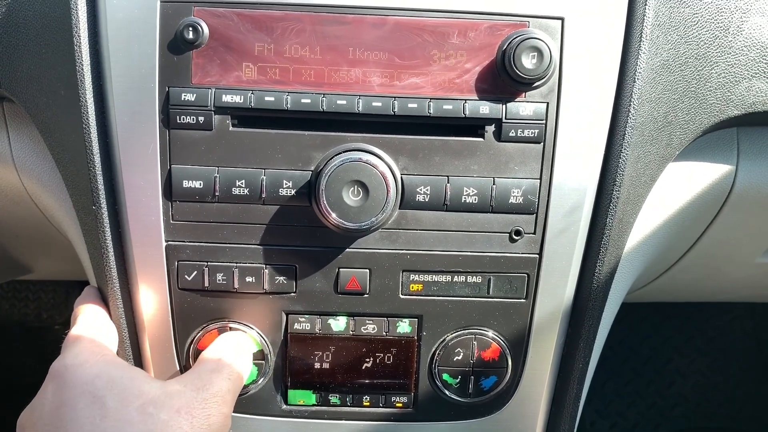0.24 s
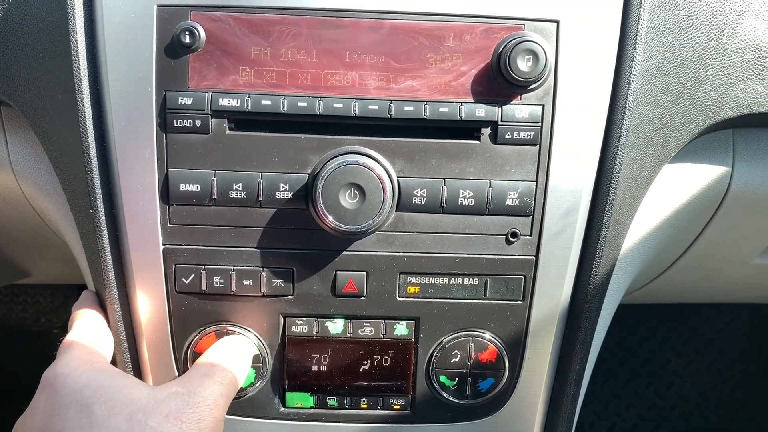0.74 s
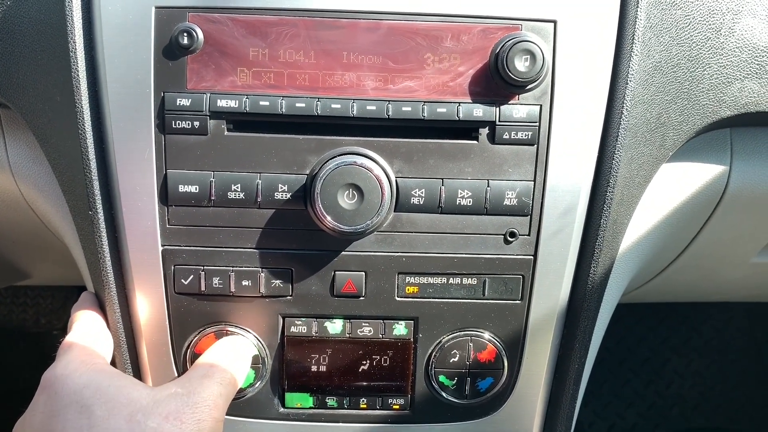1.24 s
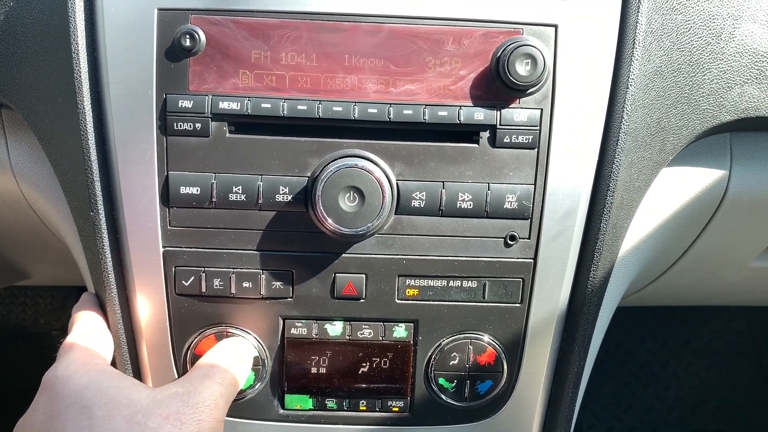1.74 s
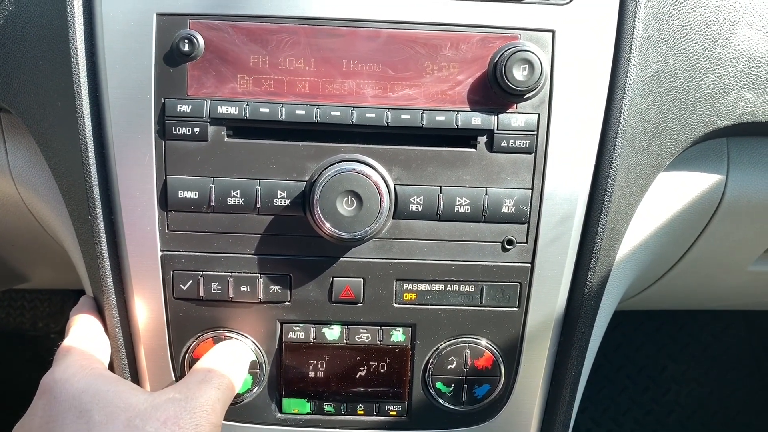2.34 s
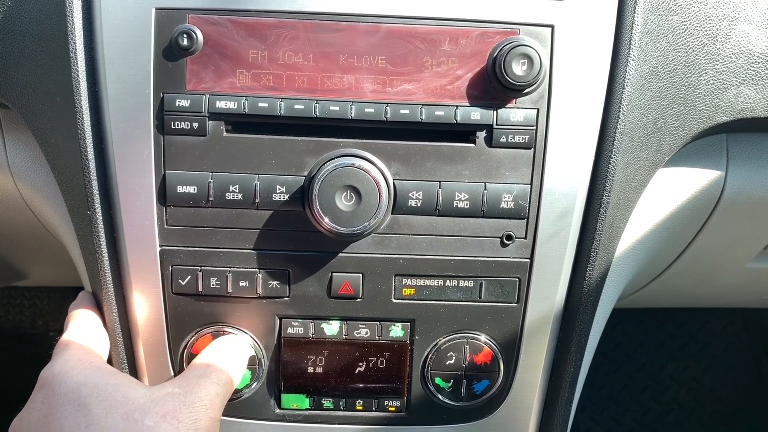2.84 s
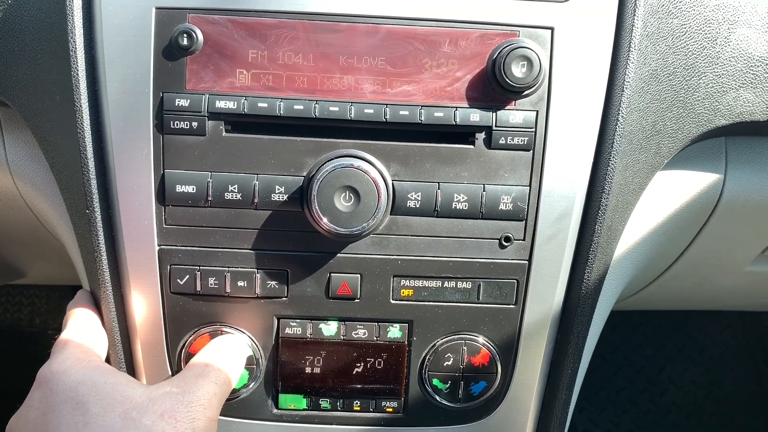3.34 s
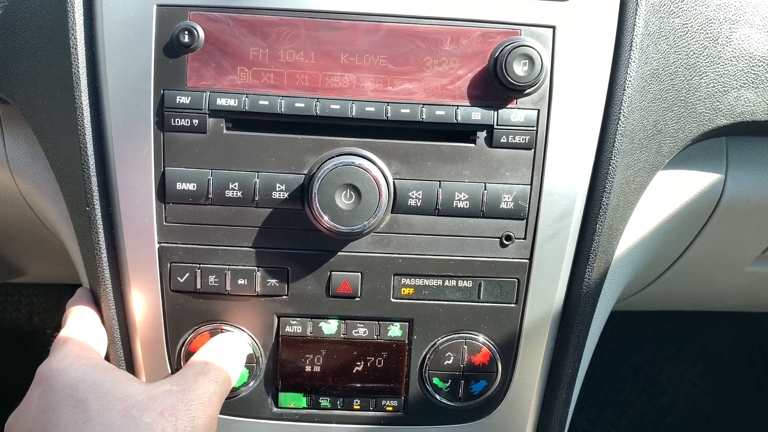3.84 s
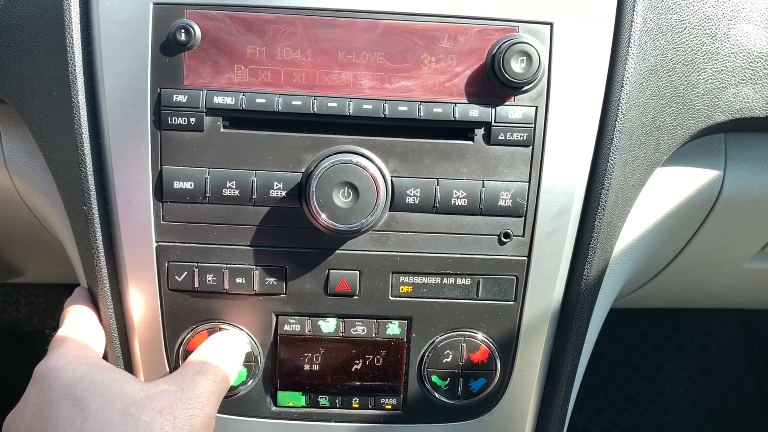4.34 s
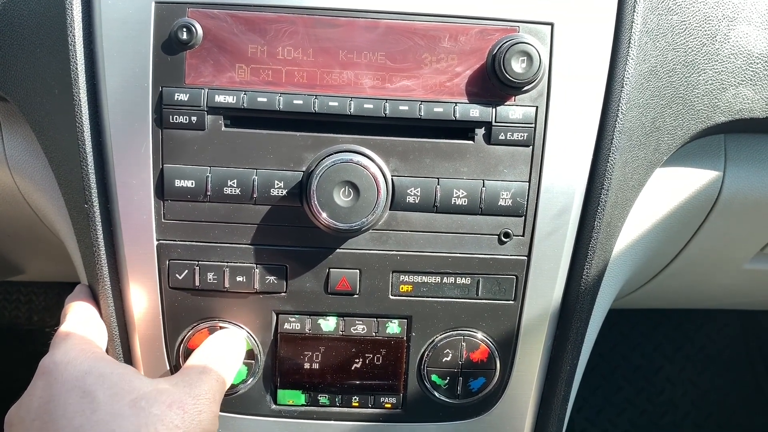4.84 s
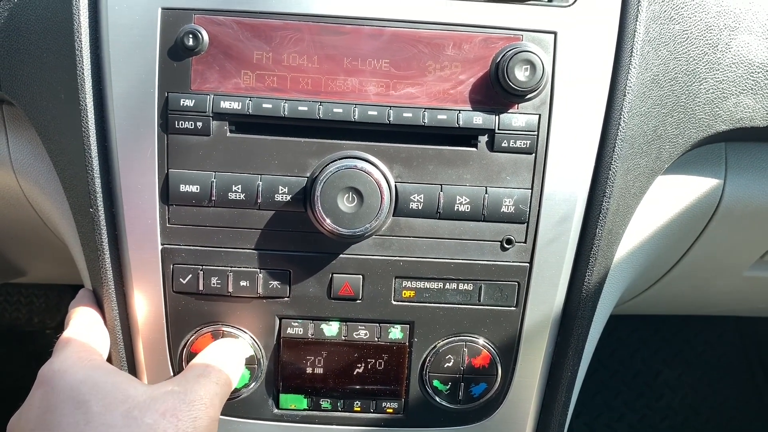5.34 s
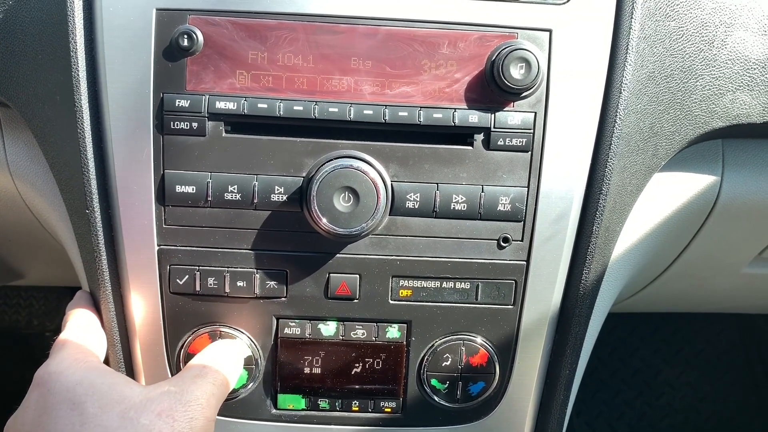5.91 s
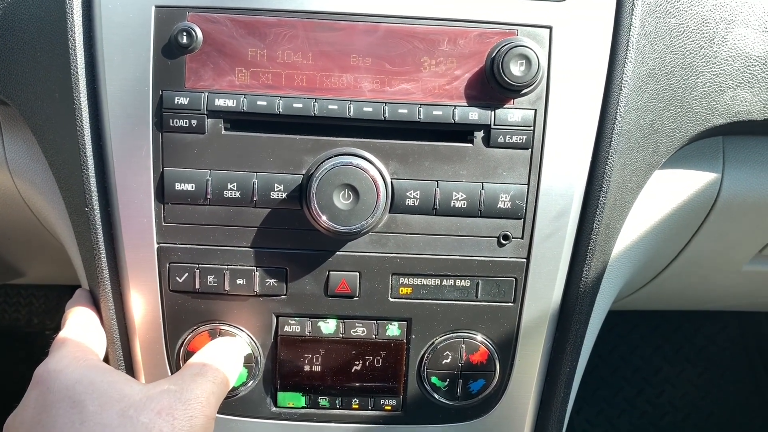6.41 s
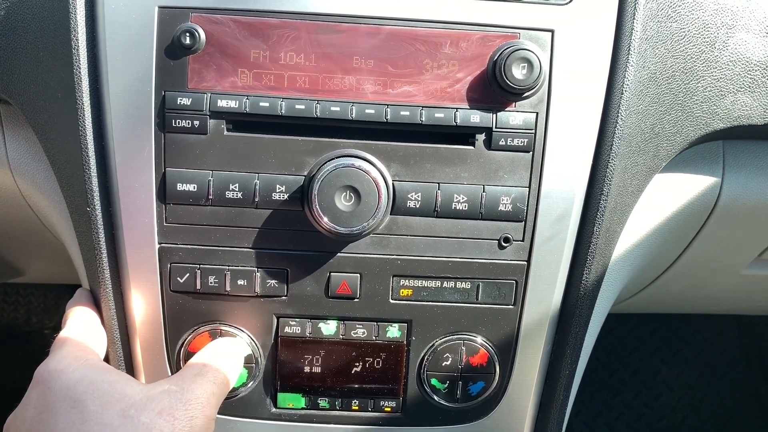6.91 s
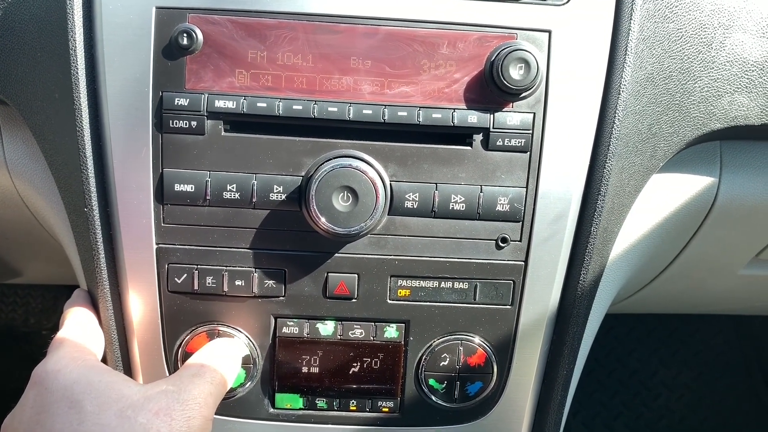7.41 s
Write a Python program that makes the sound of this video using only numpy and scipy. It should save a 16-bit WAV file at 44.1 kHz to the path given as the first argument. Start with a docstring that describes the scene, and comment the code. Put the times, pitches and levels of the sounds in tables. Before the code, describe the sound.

Broad breathy air pours from dashboard vents, with a soft whistling edge and low cabin rumble. The fan steps up immediately, holds for over four seconds, then a barely audible button tick brings a second, stronger step that swells slightly and settles. Motor whine climbs in pitch with it; the engine idles as a low hum. Stereo microphones sit close inside the car; the bass gradually narrows to the centre.

```python
"""A car heater blower heard from the front seat while the engine idles.
At once the fan speeds up: shaped noise makes the air's rush, roar, rumble and high hiss, and sine waves the motor whine.
The engine booms as low tones, a vent edge whistles breathily, and a very faint high noise band rises and falls in level.
After a second the bass starts to draw to the centre. Near 4.7 s the fan button ticks, then the fan speeds up again.
Two microphones hear the vents over paths of different length."""
import sys
import numpy as np
from scipy import signal
from scipy.fft import rfft, irfft, next_fast_len
from scipy.io import wavfile

SR = 44100
rng = np.random.default_rng(int(sys.argv[2]) if len(sys.argv) > 2 else 0)


def wav_record(signal):
    """Record a signal, one row per channel, as 16-bit PCM in the file named by sys.argv[1]."""
    frames = np.transpose(np.atleast_2d(signal))
    bounded = np.clip(frames, -1, 1)
    # unit amplitude maps onto the largest positive 16-bit level
    quanta = np.round(bounded * 32767).astype(np.int16)
    wavfile.write(sys.argv[1], SR, quanta)


N = 337806   # length in samples
SPIN_UP_S = 0.095   # lag of the heavy fan wheel
# level at the middle speed in dB, then dB gained per dB of fan speed
RUSH_LAW = (-51.5, 3.48)

# Presses of the fan button. Each row: start in seconds, commutator rate reached in Hz.
FAN_STEPS = [(0.07, 199.4), (4.83, 236.2)]
# Sound common to both microphones. Each row: frequency in Hz, share of the power (0-1).
SHARED_SOUND = [(50, 0.02), (150, 0.08), (200, 0.07), (330, 0.01), (400, 0.7), (470, .8), (550, .55),
                (620, .78), (710, .88), (810, .78), (880, .85), (1000, .74), (1080, .48), (1240, .55),
                (1325, .1), (1380, .55), (1470, .88), (1590, .12), (1710, .5), (1840, .3), (1910, .5),
                (1970, .2), (2120, .68), (2270, .35), (2440, .1), (2620, .4), (2900, .3), (4000, 0.14),
                (4800, 0.1), (7000, 0.1), (8400, 0.57)]


def from_db(db):
    """Turn decibels into a gain."""
    return 10 ** (np.asarray(db) / 20)


def rms_one(x):
    """Scale to an average (rms) level of 1."""
    return x / np.sqrt(np.mean(x ** 2) + 1e-20)


def at_hz(points, hz):
    """Read a table's second column at given frequencies, on a log-frequency axis."""
    table = np.array(points)
    return np.interp(np.log(hz), np.log(np.maximum(table[:, 0], 1)), table[:, 1])


def by_law(law, fan_db):
    """Level in dB of a sound that grows as a power of fan speed."""
    return law[0] + law[1] * fan_db


def drift(rate):
    """Slow random wandering of spread 1: noise smoothed twice, with its corner at the rate in Hz."""
    step = 40   # samples between the slow points
    r = np.exp(-2 * np.pi * rate * step / SR)
    noise = rng.standard_normal(N // step + 2002)
    slow = signal.lfilter([1], [1, -2 * r, r * r], noise)[2000:]   # drop the filter's start
    return np.interp(np.arange(N) / step, np.arange(len(slow)), rms_one(slow))


def fan_rate():
    """Commutator rate in Hz: each press sets a new speed, and the wheel eases towards it through a double lag."""
    t = np.arange(N) / SR
    last_hz = 160   # before the first press
    rate_hz = last_hz
    for start_s, hz in FAN_STEPS:
        after = np.maximum(t - start_s, 0) / SPIN_UP_S
        eased = 1 - (1 + after) * np.exp(-after)
        rate_hz = rate_hz + (hz - last_hz) * eased
        last_hz = hz
    return rate_hz


def two_microphones(common, own, colour_db, likeness):
    """A common sound reaches both sides with a phase lead; each side adds a sound of its own where given."""
    # Phase lead of the left. Each row: frequency in Hz, lead in radians.
    left_lead = [(150, 0), (190, 3.1), (330, 3.1), (390, 0), (470, 0), (550, 1.1), (680, 3.3), (850, 6.4),
                 (950, 7), (1025, 8.2), (1070, 9.7), (1240, 12.3), (1300, 12.9), (1365, 14.9), (1430, 13),
                 (1540, 13), (1600, 15.5), (1690, 17.2), (1880, 14.8), (1940, 15.5), (2000, 18.4),
                 (2080, 17.7), (2360, 18.8), (2750, 16.2), (3600, 18.2), (4600, 19.2), (5000, 21),
                 (5600, 23.4), (6500, 24.2), (8300, 22), (8800, 22), (10400, 18.85), (11700, 18.85),
                 (12500, 15.7)]
    # Balance of the sides. Each row: frequency in Hz, left minus right in dB.
    balance = [(400, -.5), (800, -0.5), (890, -2.5), (960, -1), (1310, -3.5), (1430, 2), (1590, -5),
               (1800, 3), (2040, -1), (2110, -4.5), (2290, -3), (2340, -1.5), (4200, -2.5), (5500, -3.5),
               (6500, 1), (8050, -3), (8400, 0)]
    size = next_fast_len(N)
    hz = np.maximum(np.arange(common.shape[-1]) * SR / size, 1)
    shared = np.clip(at_hz(likeness, hz), 0, 1)
    side = np.array([[0.5], [-0.5]])   # half of each difference goes to each side
    lead = np.interp(hz, *np.transpose(left_lead))
    arriving = common * np.exp(1j * side * lead)
    mixed = np.sqrt(shared) * arriving + np.sqrt(1 - shared) * own
    gain = from_db(colour_db(hz) + side * at_hz(balance, hz))
    return irfft(mixed * gain, size)[:, :N]


def gusty_noise(gust_db, gust_hz):
    """Three white noises whose frequency bands swell and sink on their own."""
    bands, size = 24, next_fast_len(N)
    hz, s, cells = signal.stft(rng.standard_normal((3, size)), SR, nperseg=1024)
    frames = np.minimum(s * SR, N - 1).astype(int)
    gusts = np.array([drift(gust_hz)[frames] for _ in range(bands)])
    octaves = np.log2(np.maximum(hz, 30) / 30)   # the bands share 9 octaves from 30 Hz up
    band = np.clip(octaves / 9 * bands, 0, bands - 1).astype(int)
    return signal.istft(cells * from_db(gust_db * gusts[band]), SR, nperseg=1024)[1][:, :size]


def air(spectrum, likeness, gust_db, gust_hz):
    """Noise coloured by a spectrum with narrow peaks and dips, gusting slightly; rms 1."""
    # Peaks (+) and dips (-) in the spectrum. Each row: frequency in Hz, width in Hz, height in dB.
    peaks_and_dips = [(459.4, 82, 7.5), (546, 47, -9.5), (741, 138, 8), (865, 55, 4.5), (1153, 120, 5),
                      (1346, 29, 1.5), (1494, 46, 6), (1790, 43, -8.5), (1810, 82, 3.5), (2059, 32, 11),
                      (2190, 93, 4), (2650, 380, 7), (4080, 290, 3.5), (5400, 85, 0.5), (6400, 66, 7),
                      (7560, 120, -13), (7800, 60, 1), (7870, 70, -8), (8100, 40, 4), (8150, 54, 9.5),
                      (9100, 120, 8), (9280, 60, 2)]
    common, *own = rfft(gusty_noise(gust_db, gust_hz))

    def colour_db(hz):
        """Spectrum plus peaks and dips, falling 40 dB per octave outside the spectrum."""
        octaves_out = np.log2(hz / np.clip(hz, spectrum[0][0], spectrum[-1][0]))
        detail = sum(db / (1 + (2 * (hz - at) / width) ** 2) for at, width, db in peaks_and_dips)
        return at_hz(spectrum, hz) + detail - 40 * abs(octaves_out)

    return rms_one(two_microphones(common, np.array(own), colour_db, likeness))


def air_rush(fan_db):
    """Air rushes from the vents and overshoots after the last press, then settles."""
    # Each row: frequency in Hz, level in dB per Hz.
    spectrum = [(430, -19.5), (520, 1), (660, -0.5), (800, -17.5), (1050, -2.5), (1300, 1.5), (1800, -3.5),
                (2500, -12), (3500, -14.5), (5000, -17.5), (6500, -24), (7600, -23), (8200, -25)]
    surge_db, surge_peak_s = 0.77, 0.58   # the peak comes this long after the press
    after = np.maximum(np.arange(N) / SR - FAN_STEPS[-1][0], 0) / surge_peak_s
    surge = surge_db * np.e * after * np.exp(-after)
    level_db = by_law(RUSH_LAW, fan_db) + surge
    return from_db(level_db) * air(spectrum, SHARED_SOUND, gust_db=1.04, gust_hz=10.2)


def duct_roar(fan_db):
    """Air roars in the ducts, weakening faster with fan speed below the middle setting."""
    # Each row: frequency in Hz, level in dB per Hz.
    spectrum = [(170, -24), (250, -3), (330, 1), (450, -7), (520, -8), (660, -6.5), (760, -4), (1000, -3.5),
                (1200, -18.5)]
    level_db = by_law((-46, 2.2), fan_db) + 1 * np.minimum(fan_db, 0)   # 1 dB more lost per dB of speed
    return from_db(level_db) * air(spectrum, SHARED_SOUND, gust_db=1.42, gust_hz=8.5)


def cabin_rumble(fan_db):
    """Turbulence rumbles in the cabin and mostly grows above the middle setting."""
    # Each row: frequency in Hz, level in dB per Hz.
    spectrum = [(14, -40), (25, -20), (33, -9), (42, -4.5), (60, 2.5), (95, -1.5), (120, -6.5),
                (160, -12.5), (200, -21), (300, -20.5)]
    above, below = np.maximum(fan_db, 0), np.minimum(fan_db, 0)
    level_db = by_law((-35, 3.44), above) + 1.1 * below
    return from_db(level_db) * air(spectrum, SHARED_SOUND, gust_db=0.27, gust_hz=4.4)


def swell_upper_band(hiss):
    """One band of the hiss comes up with the higher speed, grows slowly and drops back quickly."""
    # Extra level of the upper hiss. Each row: time in seconds, level in dB.
    swell = [(4.75, 4), (5.15, 7.5), (5.9, 7), (6.3, 8.5), (6.84, 11), (6.92, 6)]
    gain = from_db(np.interp(np.arange(N) / SR, *np.transpose(swell)))
    band_filter = signal.butter(2, (9380, 11270), "band", fs=SR, output="sos")   # edges in Hz
    return hiss + (gain - 1) * signal.sosfilt(band_filter, hiss)


def high_hiss(fan_db):
    """High hiss: a steady background part, and an air part that grows steeply with fan speed."""
    # Each row: frequency in Hz, level in dB per Hz.
    spectrum = [(4300, -24), (5500, -8), (7200, 0), (7600, -2), (8000, -3), (8250, 4), (8700, 5.5),
                (9400, -1), (10300, -5.5), (10900, -8.5), (12000, -1.5), (12300, -9), (12900, -6),
                (13900, -8), (14500, -26)]
    # Hiss common to both microphones. Each row: frequency in Hz, share of the power (0-1).
    likeness = [(7000, .1), (7900, .6), (8400, .95), (9000, .95), (9600, .7), (10300, .75), (10500, 1),
                (11650, 1), (12000, .45), (12500, .9), (12800, 1)]
    background, moving_air = from_db(-71.5), from_db(by_law((-74.5, 7.2), fan_db))
    level = np.hypot(background, moving_air)   # the powers add
    return swell_upper_band(level * air(spectrum, likeness, gust_db=1, gust_hz=15.0))


def whistle(fan_db):
    """A vent edge whistles breathily: narrow noise round a wandering centre, partly different on the two sides."""
    centre_hz, width_hz, wander_hz = 2055, 102, 30
    low_pass = signal.butter(2, width_hz / 2, fs=SR)
    slow = signal.lfilter(*low_pass, rng.standard_normal((2, 3, N)))
    phase = 2 * np.pi * np.cumsum(centre_hz + wander_hz * drift(4.0)) / SR
    tone = rms_one(slow[0] * np.sin(phase) + slow[1] * np.cos(phase))
    level = from_db(by_law((-63.5, 4.7), fan_db))
    common, *own = rfft(tone * level, next_fast_len(N))
    return two_microphones(common, np.array(own), np.zeros_like, SHARED_SOUND)


def motor(load_db):
    """Brush contacts give overtones of the commutator rate, uneven round the shaft; the hum grows fastest with load."""
    # Overtones as the motor housing passes them. Each row: frequency in Hz, level in dB before load and wobble.
    housing = [(2000, -97), (2360, -86), (2400, -72), (2490, -72), (2600, -81), (2790, -83), (2835, -75.5),
               (2990, -76), (3070, -86), (3200, -81), (3300, -90), (3390, -82), (3700, -87), (4200, -87),
               (4500, -94), (4790, -88), (5000, -96), (5200, -91), (6400, -92), (7300, -99), (8030, -90),
               (8300, -99), (9500, -102)]
    # Uneven contacts. Each row: times per shaft turn, depth as a share of the level.
    unevenness = [(1, .55), (2, .55)]
    segments = 6   # brush contacts per turn of the shaft
    rate_hz = fan_rate()
    turns = np.cumsum(rate_hz * (1 + 0.0005 * drift(3.5))) / SR   # cycles of the commutator rate
    hum_db = -64 + 0.9 * load_db + 2.5 * drift(3)   # load is added once more at the end
    hum = from_db(hum_db) * np.sin(2 * np.pi * turns)
    coarse = np.arange(0, N, 64)   # levels change slowly, so every 64th sample is enough
    whine = 0
    for k in range(8, 48):
        level_db = at_hz(housing, k * rate_hz[coarse]) + 3.5 * drift(2)[coarse]   # wavers by 3.5 dB
        level = np.interp(np.arange(N), coarse, from_db(level_db))
        whine += level * np.sin(2 * np.pi * (k * turns + rng.random()))
    wobble = 1
    for times, depth in unevenness:
        wobble = wobble + depth * np.sin(2 * np.pi * (times * turns / segments + rng.random()))
    return (hum + wobble * whine) * from_db(load_db)   # heard alike on both sides


def engine(load_db):
    """The firing order booms in the cabin as a near-pure tone over a weaker crank order, one side a little early."""
    # Each row: multiple of the firing rate, level in dB relative to the boom.
    orders = [(2 / 3, -22), (0.99, 0)]
    hz = 47.85 - 0.2 * load_db   # the idle firing rate sags as the load grows
    turns = np.cumsum(hz * (1 + 0.012 * drift(20.0))) / SR
    early = np.array([[0.3], [-0.3]])   # radians
    tone = sum(from_db(db) * np.sin(2 * np.pi * k * turns + early) for k, db in orders)
    level_db = by_law((-40.5, 4.5), load_db) + 2.6 * drift(5)   # wavers by 2.6 dB
    return np.sqrt(2) * from_db(level_db) * tone


def button():
    """The plastic of the fan button ticks faintly: a short soft-edged ring."""
    # Each row: frequency in Hz, level in dB.
    ring_tones = [(8600, -58), (11200, -57), (13300, -59)]
    press_s, rise_s, t60_s = 4.667, 0.001, 0.015   # t60: time to fall by 60 dB
    after = np.maximum(np.arange(N) / SR - press_s, 0)
    ring = sum(from_db(db) * np.sin(2 * np.pi * hz * after) for hz, db in ring_tones)
    tick = ring * np.minimum(after / rise_s, 1) * from_db(-60 * after / t60_s)
    all_shared = [(20, 1), (20000, 1)]
    return two_microphones(rfft(tick, next_fast_len(N)), 0, np.zeros_like, all_shared)


def faint_high_band():
    """A very faint noise band at 14.8-15.7 kHz, alike on both sides, whose level rises and falls every 1.02 s."""
    period_s, loudest_s = 1.02, 0.19
    band_filter = signal.butter(6, (14800, 15700), "band", fs=SR, output="sos")   # edges in Hz
    band = signal.sosfilt(band_filter, rng.standard_normal(N))
    rise_and_fall_db = 5.5 * np.cos(2 * np.pi * (np.arange(N) / SR - loudest_s) / period_s)
    return from_db(-90 + rise_and_fall_db + 3.0 * drift(9.0)) * rms_one(band)   # the drift flickers


def scene():
    """Air, motor and engine follow the fan speed; the button and the faint high band do not."""
    fan_db = 20 * np.log10(fan_rate() / FAN_STEPS[0][1])   # speed above the middle setting
    noises = air_rush(fan_db) + duct_roar(fan_db) + cabin_rumble(fan_db) + high_hiss(fan_db)
    machines = motor(RUSH_LAW[1] * fan_db) + engine(np.maximum(fan_db, 0))
    return noises + whistle(fan_db) + machines + button() + faint_high_band()


def centre_bass(x):
    """The bass starts wide; then, below a rising edge, the left-right difference fades and the centre gains."""
    # Power the centre gains in its place. Each row: frequency in Hz, share of its power.
    centre_gain = [(100, 0.77), (170, 0.91), (220, 1.76), (330, 1.63), (420, 0.32)]
    wide_until_s, edge_from_hz, edge_to_hz, edge_rise_s = 1.15, 254, 557, 6.1
    edge_width_hz = 25   # softness of the edge
    hz, s, (mid, side) = signal.stft([x[0] + x[1], x[0] - x[1]], SR, nperseg=2048)
    since = s - wide_until_s
    edge_hz = edge_to_hz - (edge_to_hz - edge_from_hz) * np.exp(-since / edge_rise_s)
    below_edge = np.clip((edge_hz - hz[:, None]) / edge_width_hz, -40, 40)
    kept = np.where(since < 0, 1, 1 / (1 + np.exp(below_edge)))
    gained = np.interp(hz, *np.transpose(centre_gain))[:, None] * (1 - kept ** 2)
    mid = mid * np.sqrt(1 + gained)
    mid, side = signal.istft([mid, side * kept], SR, nperseg=2048)[1][:, :N]
    return np.array([mid + side, mid - side]) / 2


def record(dry):
    """The bass is drawn to the centre, the start fades in, the top is cut steeply."""
    fade_in_s, cutoff_hz = 0.005, 15800
    faded = centre_bass(dry) * np.minimum(np.arange(N) / SR / fade_in_s, 1)
    return signal.sosfilt(signal.ellip(12, 0.5, 70, cutoff_hz, fs=SR, output="sos"), faded)


dry = scene()
out = record(dry)
wav_record(out)
```